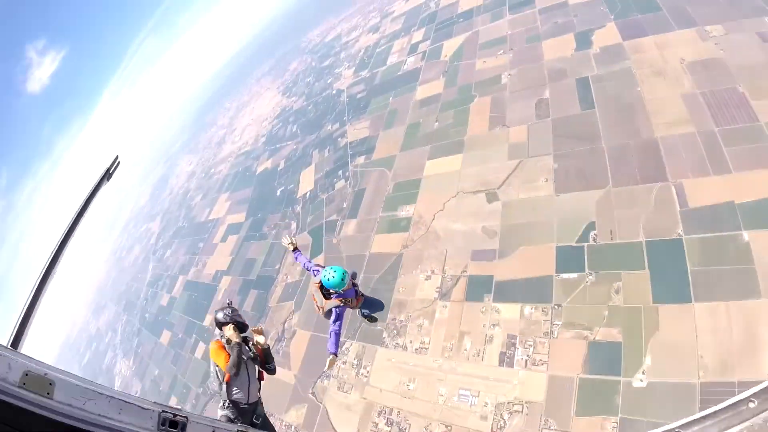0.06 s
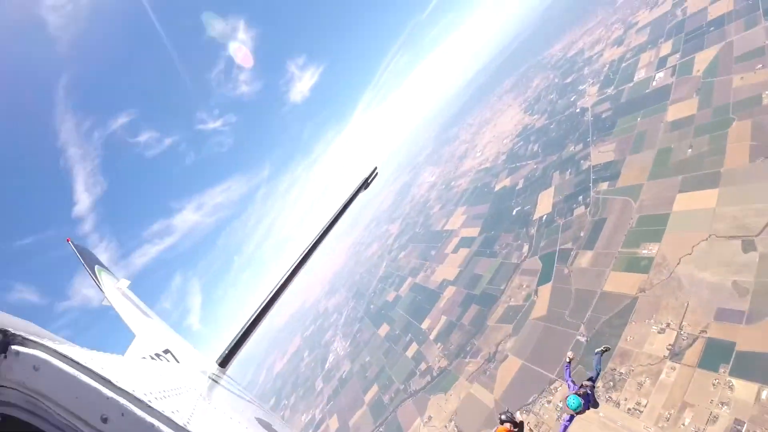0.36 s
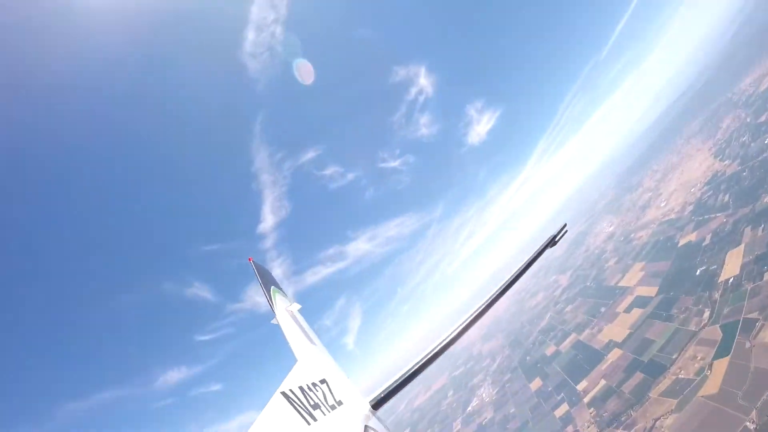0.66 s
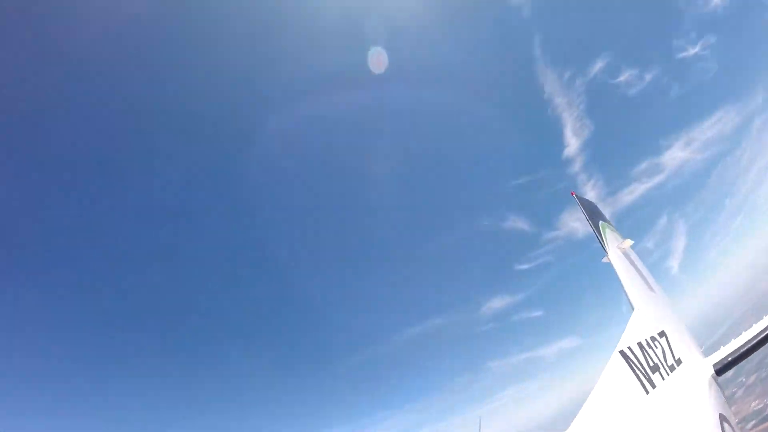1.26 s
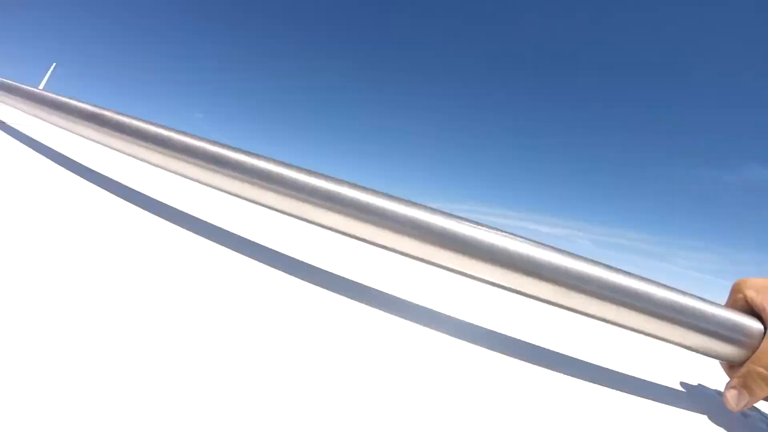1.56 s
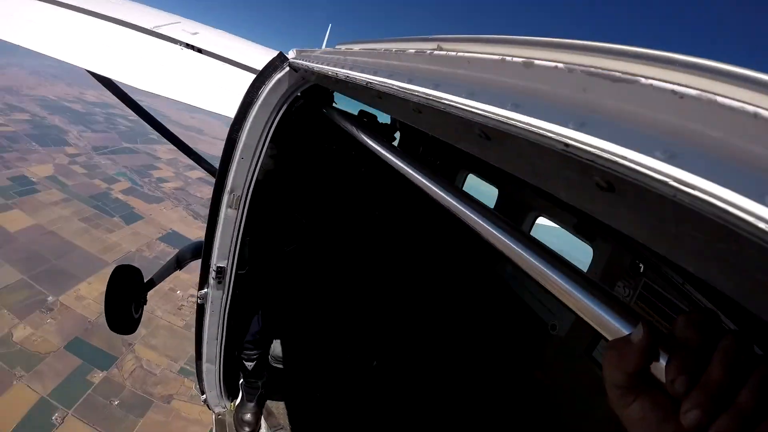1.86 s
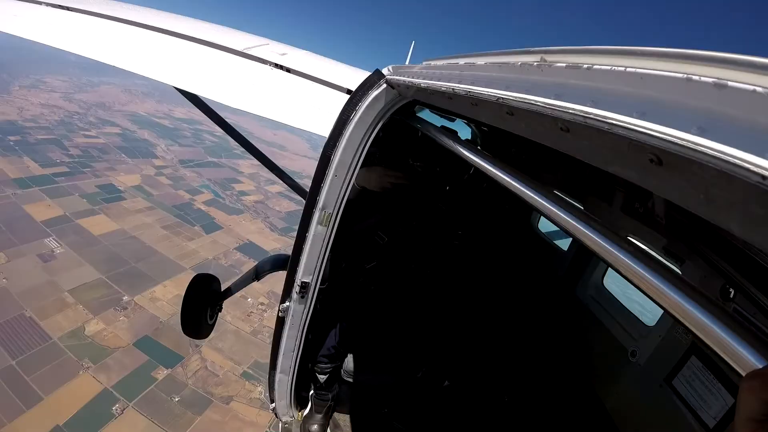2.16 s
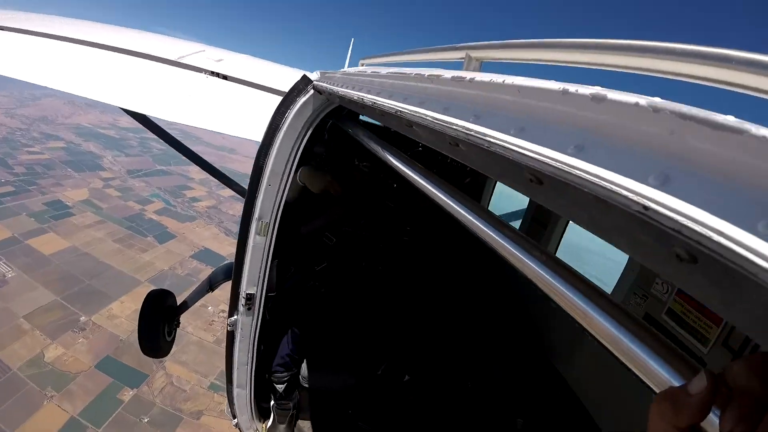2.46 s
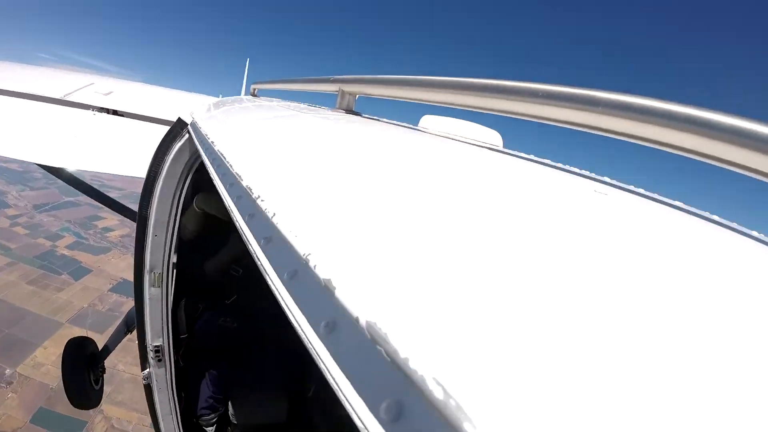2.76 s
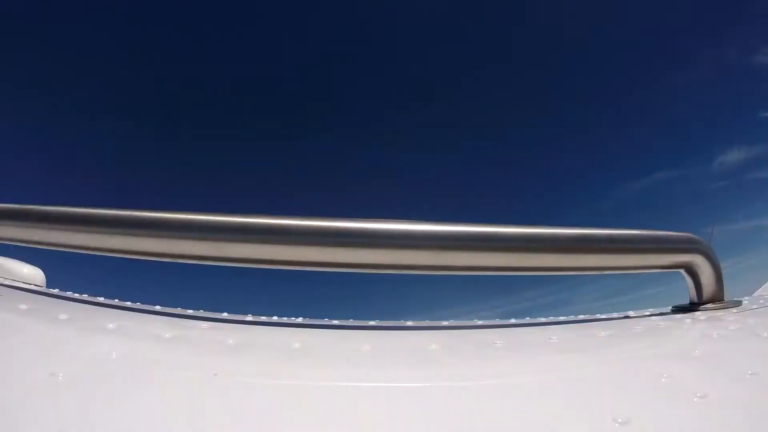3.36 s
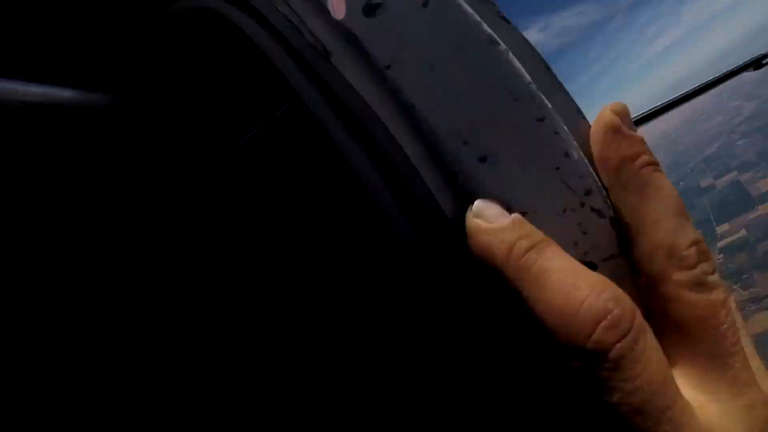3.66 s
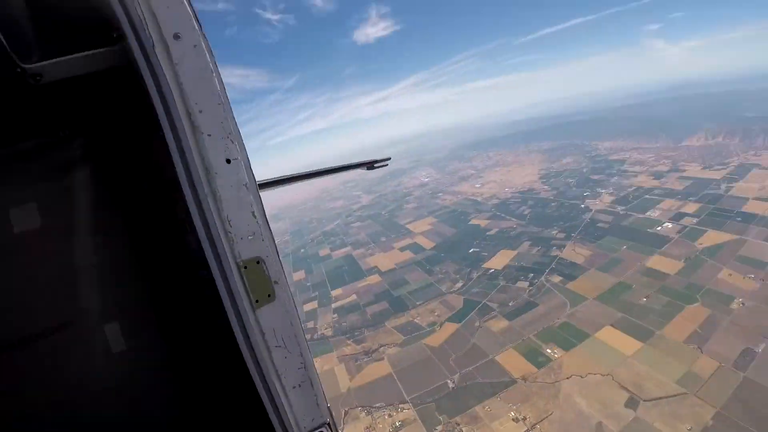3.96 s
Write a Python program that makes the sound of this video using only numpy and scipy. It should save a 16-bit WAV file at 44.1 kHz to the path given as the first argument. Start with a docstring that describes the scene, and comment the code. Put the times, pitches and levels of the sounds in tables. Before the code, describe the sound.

Strong wind hits the microphone at a small plane's open door, first thumping, then roaring more smoothly with a short whoosh, then breaking into ragged slaps. The engine and propeller drone faintly below and fade near the end.

```python
"""Outside a small aircraft in flight, a microphone is carried along the side and in through the open door.
Turbulent pressure on the microphone rumbles, buffets and hisses: smooth in the free stream, torn into
slapping eddies by the door. Flow grazing an edge resonates in brief throbs, a squeak and a whoosh.
Engine and propeller drone faintly underneath; a limiter holds the peaks."""
import sys
import numpy as np
from scipy import signal
from scipy.fft import rfft, irfft, next_fast_len
from scipy.io import wavfile
from scipy.ndimage import uniform_filter1d, minimum_filter1d, map_coordinates

SR = 44100
rng = np.random.default_rng(int(sys.argv[2]) if len(sys.argv) > 2 else 0)


def inscribe(sig):
    """Save sig as 16-bit PCM at rate SR to the path in sys.argv[1].

    A 1-D sig is mono; a 2-D sig holds one channel per row.
    Samples are clipped to [-1, 1] before scaling.
    """
    pcm = np.round(np.clip(np.atleast_2d(sig).T, -1, 1) * 32767)
    wavfile.write(sys.argv[1], SR, pcm.astype(np.int16))


N = 176400


def amp(db):
    """Amplitude ratio of a level in decibels."""
    return 10 ** (np.asarray(db) / 20)


def unit(x):
    """Normalisation to unit rms."""
    return x / np.sqrt(np.mean(x ** 2) + 1e-20)


def curves(rows):
    """Linear interpolation in time of each column after the first, one value a sample."""
    times, *columns = np.transpose(rows)
    return [np.interp(np.arange(N) / SR, times, column) for column in columns]


def wobble(rate):
    """Smooth random modulation: a spline through rate knots a second, at unit rms."""
    knots = rng.standard_normal(N // 8)
    return unit(map_coordinates(knots, [2 + np.arange(N) * rate / SR], mode="wrap"))


def filtered(x, response):
    """Linear filtering: the spectrum of x times a frequency response."""
    size = next_fast_len(N + 8192)
    return irfft(rfft(x, size) * response(np.fft.rfftfreq(size, 1 / SR)), size)[..., :N]


def coloured(x, spectrum):
    """Spectral shaping by (f/Hz, level/dB) points, conserving the power of white noise."""
    hz, db = np.transpose(spectrum)
    return filtered(x, lambda f: unit(amp(np.interp(np.log(f + 1), np.log(hz), db))))


def bell(centre, spread):
    """Gaussian envelope, down to 1/e^2 at spread seconds from its centre."""
    return np.exp(-2 * np.minimum(((np.arange(N) / SR - centre) / spread) ** 2, 20))


# Strength of the rumble: t/s, level/dB
RUMBLE_LEVEL = [(0.0, -3), (0.19, -17.5), (0.26, -5.5), (0.38, -12), (1.12, -14), (1.3, -15.5), (2.15, -12),
                (2.3, -10.5), (3.45, -10), (3.66, -18), (3.71, -11), (3.84, -16.5), (3.94, -14.5),
                (3.98, -28)]
# Spectrum of the rumble: f/Hz, relative level/dB
RUMBLE_SPECTRUM = [(18, -16), (35, 2.5), (55, 4.5), (85, -3.5), (120, 0.5), (170, -21.5), (600, -82)]

def rumble():
    """Large-scale turbulence: slow pressure swings of fairly even size on the microphone."""
    level_db, = curves(RUMBLE_LEVEL)
    pressure = coloured(rng.standard_normal(N), RUMBLE_SPECTRUM)
    power = uniform_filter1d(uniform_filter1d(pressure ** 2, size=1500), size=1500)
    envelope = np.sqrt(np.abs(power) + 0.16)
    return amp(level_db) * unit(pressure / envelope)


def snaps(per_second=200):
    """Shot noise: tiny eddies burst on the microphone as clicks of random time and size."""
    hits = rng.random(N) < per_second / SR
    return unit(hits * rng.standard_normal(N))


# Air noise as the microphone turns in the flow: t/s, then level/dB of buffet, roar, treble, hiss, sizzle
STREAM_LEVELS = [(0.0, -21.5, -22.5, -32.5, -49.5, -63), (0.15, -24.5, -28.5, -38, -62.5, -69),
                 (0.5, -19.5, -38, -48.5, -58.5, -80), (0.78, -19.5, -30.5, -40, -50, -61),
                 (0.93, -13, -24, -36.5, -47.5, -56), (0.98, -9.5, -20.5, -33.5, -44, -59),
                 (1.11, -10.5, -16.5, -28, -41, -51), (1.155, -4, -18, -37.5, -49, -51),
                 (1.175, -20, -19.5, -36, -51.5, -50.5), (1.37, -15, -17, -28, -55, -49.5),
                 (1.45, -14, -16.5, -21, -50, -46), (1.53, -19, -25, -26.5, -43, -47.5),
                 (1.75, -14, -32, -40.5, -69.5, -68), (2.19, -15, -29.5, -42.5, -53, -57),
                 (2.22, -12.5, -22.5, -34, -45.5, -56), (2.85, -14, -25, -35, -45.5, -57),
                 (3.28, -20.5, -28, -32.5, -51.5, -42.5), (3.335, -12.5, -21, -26, -48, -44),
                 (3.4, -14, -22, -36, -65, -55.5), (3.52, -8.5, -26, -38.5, -62, -60),
                 (3.64, -34, -53.5, -61, -83, -81), (3.74, -12.5, -37, -49, -84, -64),
                 (3.97, -40, -52.5, -56.5, -59.5, -73.5)]
# How torn the flow is: t/s, roughness (0 is smooth, about 1 fully torn)
FLOW_ROUGHNESS = [(0, 0), (0.25, 1), (.55, 0.57), (0.9, 0.37), (1.4, 0.16), (1.6, 0.4), (1.85, 1.27),
                  (2.35, 0.88), (3.0, 0.65), (3.2, 0.44), (3.35, 0.7), (3.55, 0.48)]
# Spectra of the air noise bands, low to high: f/Hz, relative level/dB
BUFFET_SPECTRUM = [(60, -21), (130, 2.5), (200, 0.5), (300, -5), (450, -11.5), (1000, -31.5), (6000, -98.5)]
BODY_SPECTRUM = [(200, -19), (400, 0), (600, -1), (1000, -13.5), (6000, -81.5)]
ROAR_SPECTRUM = [(250, -7.5), (500, -9), (800, 0.5), (1500, -4), (2100, -13.5), (3000, -31.5), (12000, -88)]
TREBLE_SPECTRUM = [(1200, -28), (1900, 0.5), (2500, -2), (4300, -10.5), (4900, -15), (12000, -47)]
HISS_SPECTRUM = [(5100, -24.5), (5700, -2.5), (7200, -2.5), (8400, -8.5), (10000, -24), (13000, -47)]
SIZZLE_SPECTRUM = [(5000, -12), (5800, 4), (6800, -5), (8500, 3.5), (10400, 0.5), (12000, -16.5),
                   (13500, -18), (15000, -41.5)]

def slipstream(eddy_hz=100, ripple_hz=330, crackle_hz=1500):
    """Amplitude modulation: the same eddies swing all bands, more deeply the rougher the flow."""
    roughness, = curves(FLOW_ROUGHNESS)
    buffet_db, roar_db, treble_db, hiss_db, sizzle_db = curves(STREAM_LEVELS)
    body_db = (buffet_db + roar_db) / 2 - 3  # the buffeting brightens as the roar grows
    swirl = wobble(eddy_hz) + wobble(ripple_hz)
    fast_swirl = unit(swirl - uniform_filter1d(swirl, size=4000))
    eddies = 2 * np.tanh(fast_swirl / 2)
    crackle = amp(2.5 * roughness * wobble(crackle_hz))
    clicks = roughness * amp(-2) * snaps()
    bands = [(BUFFET_SPECTRUM, buffet_db, 6, 0), (BODY_SPECTRUM, body_db, 6, 0),
             (ROAR_SPECTRUM, roar_db, 6.5, 0), (TREBLE_SPECTRUM, treble_db, 7, 0.5),
             (HISS_SPECTRUM, hiss_db, 7, 1), (SIZZLE_SPECTRUM, sizzle_db, 7, 1)]
    air = np.zeros(N)
    for spectrum, level_db, depth, click_share in bands:
        noise = crackle * rng.standard_normal(N) + click_share * clicks
        flutter = noise * amp(depth * roughness * eddies)
        flutter /= np.sqrt(uniform_filter1d(flutter ** 2, size=6000))  # only fast swings remain
        air += amp(level_db) * unit(coloured(flutter, spectrum))
    return air


def engine(pitch_hz=88.04, level_db=-22):
    """Periodic source: engine and propeller drone on one wavering tone, fading on the way inside."""
    frequency = pitch_hz * (1 + 0.013 * wobble(5.99))
    phase = 2 * np.pi * np.cumsum(frequency) / SR
    fade_db = -10 * np.clip((np.arange(N) / SR - 3.5) / 0.5, 0, 1)
    return amp(level_db + fade_db) * unit(np.sin(phase))


# Deep throbs, a rough squeak, a whoosh thinning to a hiss: t/s, spread/s, f/Hz, half-width/Hz, level/dB
EDGE_RESONANCES = [(0.087, 0.31, 60, 19, -9), (0.283, 0.095, 97, 19, -11), (0.081, 0.015, 1800, 310, -21.5),
                   (1.44, 0.033, 1800, 890, -21.5), (1.53, 0.12, 4800, 730, -40)]

def edge_resonances():
    """Flow-excited resonance: bands of noise sing for a moment as the air grazes an edge."""
    sound = np.zeros(N)
    for centre, spread, hz, half_width, level_db in EDGE_RESONANCES:
        band = unit(filtered(rng.standard_normal(N), lambda f: 1 / (1 + ((f - hz) / half_width) ** 4)))
        envelope = np.sqrt(np.abs(signal.hilbert(band)) ** 2 + 0.5)
        sound += amp(level_db) * bell(centre, spread) * unit(band / envelope)
    return sound


# Single strong eddies: t/s, thump level/dB, crack level/dB, spread/s
EDDY_SLAPS = [(0.099, -10.5, -32, 0.0026), (0.193, -10, -22, 0.0054), (0.222, -18.5, -19, 0.0016),
              (0.237, -6.5, -10.5, 0.0048), (0.268, -7.5, -18.5, 0.0075), (0.288, -1, -17, 0.0062),
              (0.324, -8, -22.5, 0.004), (0.347, -14.5, -29, 0.012), (0.399, -12, -26, 0.0054),
              (0.491, -21, -25.5, 0.003), (0.631, -17.5, -24, 0.0067), (1.779, -13, -23.5, 0.0055),
              (1.909, -17, -28, 0.0033), (1.943, -4.5, -15, 0.0022), (2.027, -10, -27, 0.0086),
              (2.065, -9.5, -26, 0.004), (2.102, -8.5, -29, 0.0055), (2.143, -8.5, -28, 0.012),
              (2.239, -5.5, -18, 0.0036), (2.279, -16.5, -22, 0.0048), (2.341, -14, -21.5, .003),
              (2.501, -20.5, -24, .004), (2.522, -7, -16.5, 0.0042), (2.993, -9, -21, 0.004),
              (3.234, -19.5, -16, 0.003), (3.345, -19, -19, 0.009), (3.378, -11.5, -18.5, 0.0076),
              (3.71, -19, -39, 0.0063), (3.888, -22, -38.5, 0.005)]
# Spectra of the two parts of a slap: f/Hz, relative level/dB
THUMP_SPECTRUM = [(40, -25.5), (130, 2), (280, -1.5), (600, -9.5), (1000, -12.5), (2000, -27), (6000, -73)]
CRACK_SPECTRUM = [(500, -17.5), (1400, 7.5), (2400, -1), (4100, -10.5), (7500, -24.5), (10500, -36.5),
                  (14000, -59)]

def eddy_slaps(grain_db=2, grain_hz=1500):
    """Pressure transients: each strong eddy hits the microphone with a low thump and a bright crack."""
    thumps = sum(amp(db) * bell(centre, spread) for centre, db, _, spread in EDDY_SLAPS)
    cracks = sum(amp(db) * bell(centre, spread) for centre, _, db, spread in EDDY_SLAPS)
    sound = np.zeros(N)
    for envelope, spectrum in (thumps, THUMP_SPECTRUM), (cracks, CRACK_SPECTRUM):
        ragged_noise = unit(rng.choice([-1, 1], N) * amp(grain_db * wobble(grain_hz)))
        sound += coloured(envelope * ragged_noise, spectrum)
    return sound


def scene():
    """Superposition: the pressures of all sources add at one microphone."""
    return (rumble() + slipstream() + engine() + edge_resonances() + eddy_slaps())[None]


def record(dry):
    """Peak limiting and band limiting: the gain dips around each peak, then the top treble is cut."""
    ceiling, smoothing_s, cutoff_hz = 0.99, 0.0063, 15000
    window = int(smoothing_s * SR)
    allowed_gain = np.minimum(1, ceiling / (np.abs(dry) + 1e-9))
    gain = uniform_filter1d(minimum_filter1d(allowed_gain, 2 * window), window)
    return filtered(dry * gain, lambda f: f < cutoff_hz)


dry = scene()
out = record(dry)
inscribe(out)
```